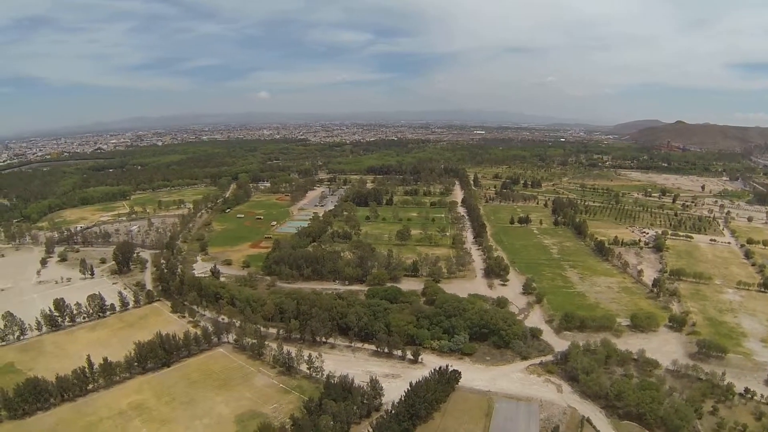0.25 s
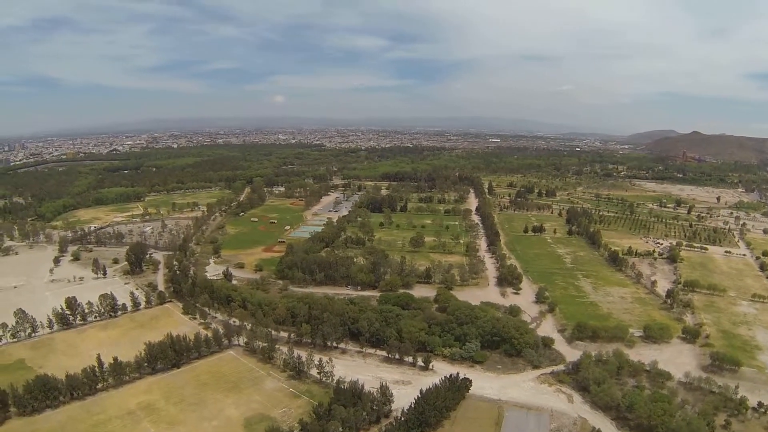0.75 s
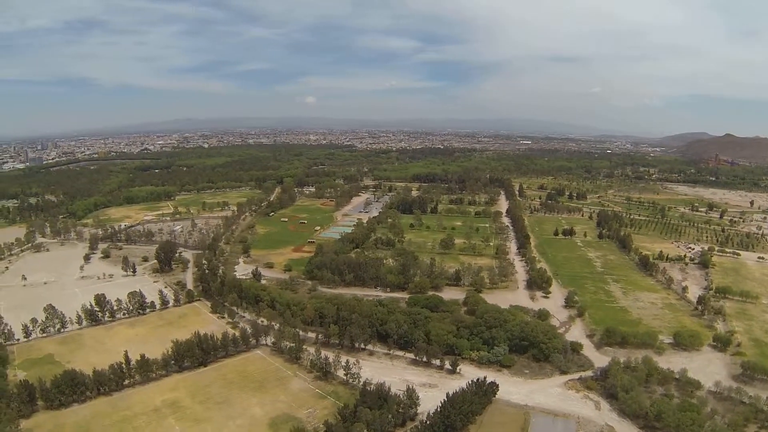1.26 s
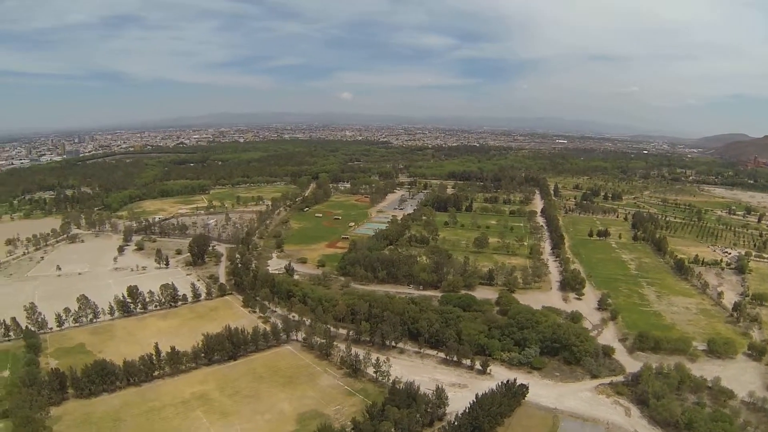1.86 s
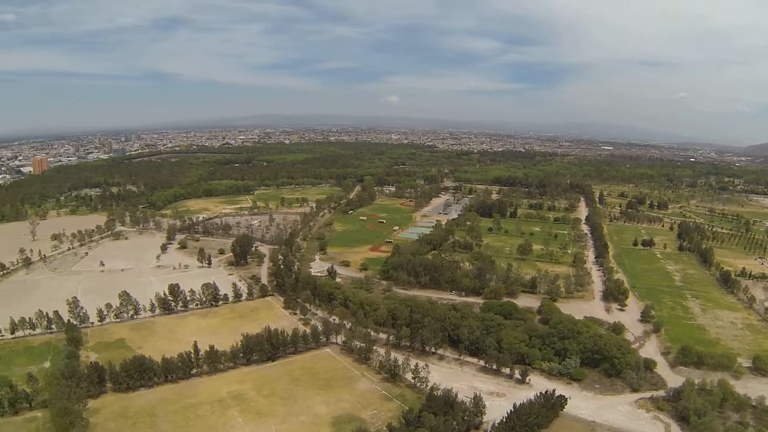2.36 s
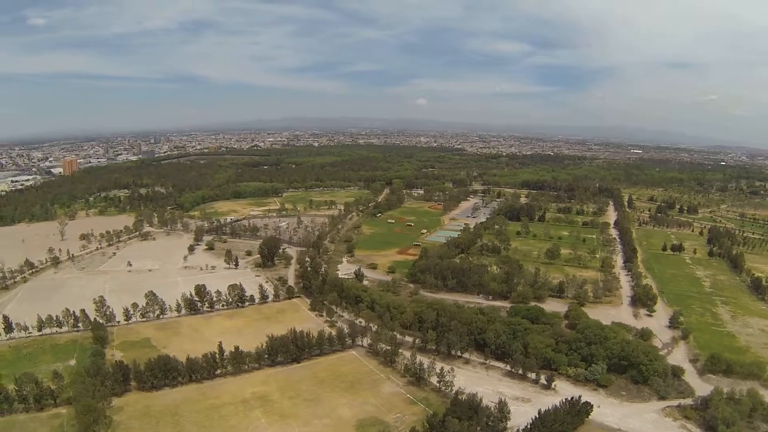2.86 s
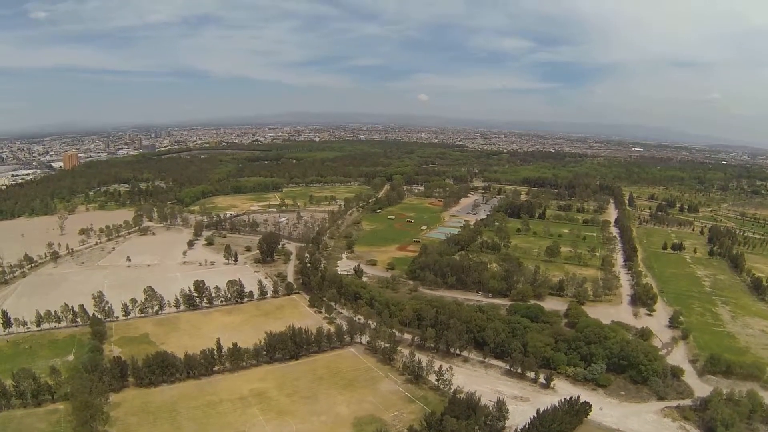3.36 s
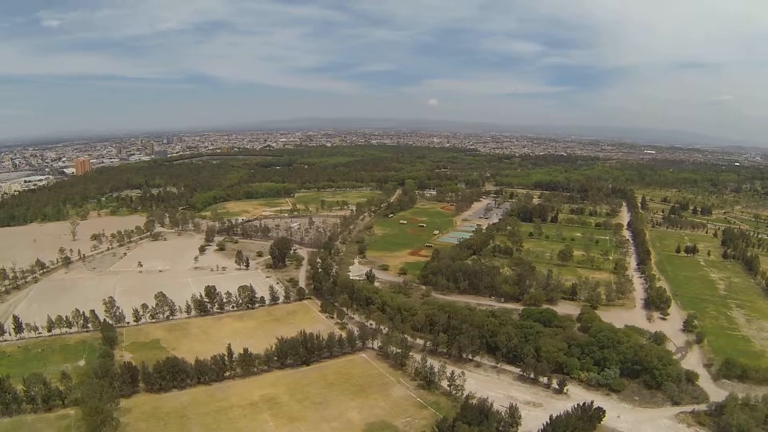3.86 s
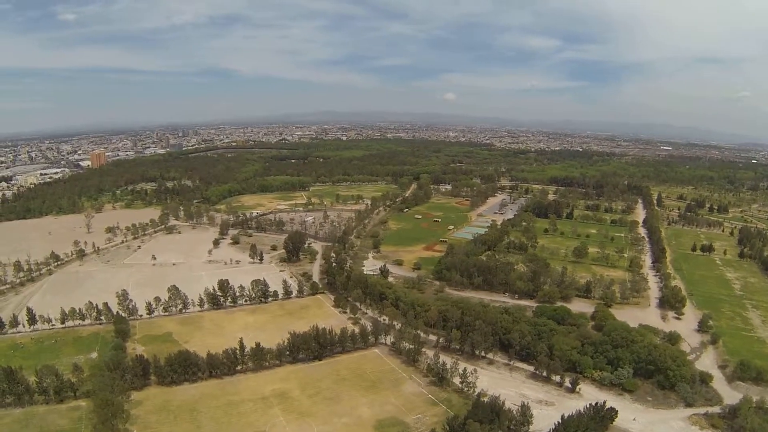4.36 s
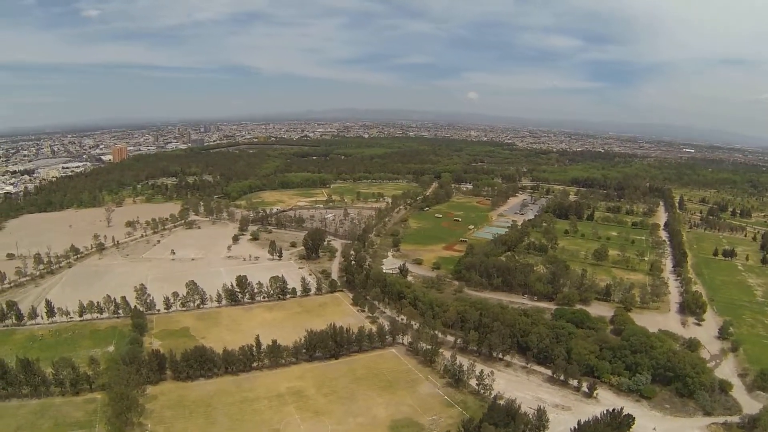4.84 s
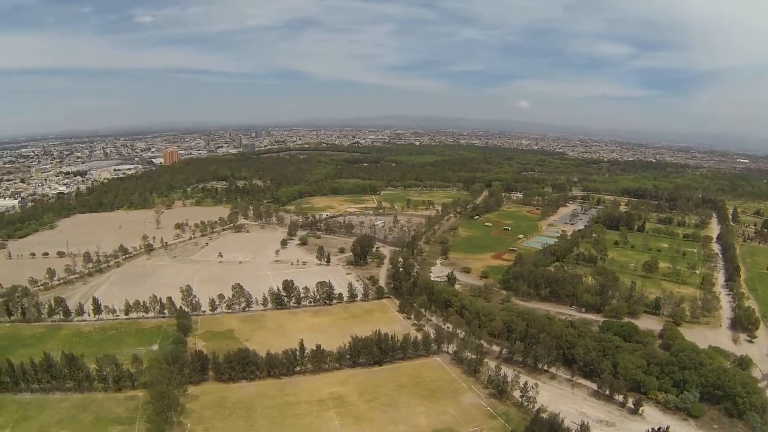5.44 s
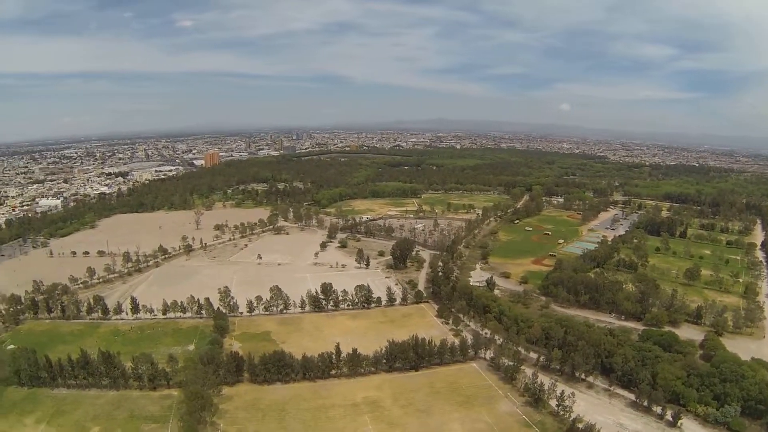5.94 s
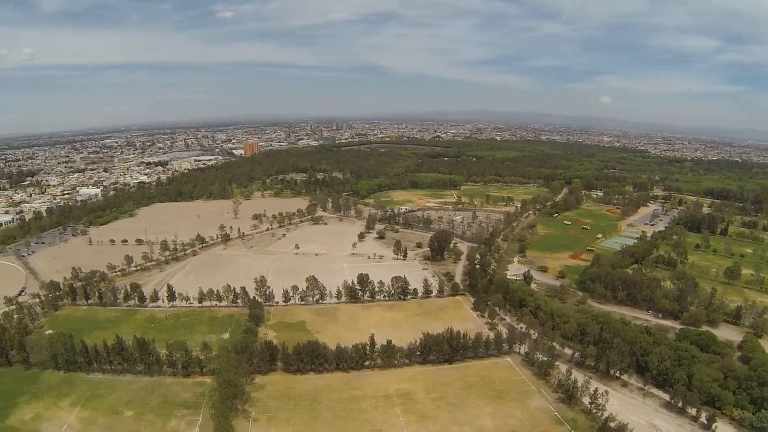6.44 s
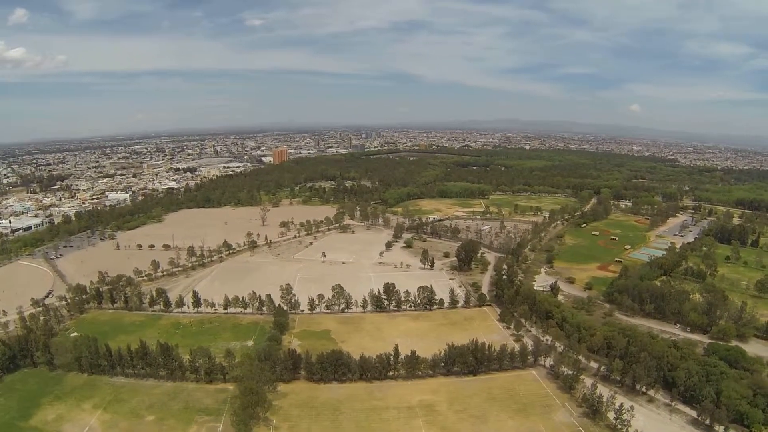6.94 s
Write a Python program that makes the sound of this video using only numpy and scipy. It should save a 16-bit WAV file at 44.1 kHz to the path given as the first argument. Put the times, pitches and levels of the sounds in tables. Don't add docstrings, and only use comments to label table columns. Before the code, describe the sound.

Close, boxy buzz of a hovering drone wavers and beats, then its pitches spread in a banking turn as wind thumps and blades hiss.

```python
import sys
import numpy as np
from scipy import signal
from scipy.fft import rfft, irfft, next_fast_len
from scipy.io import wavfile
from scipy.ndimage import uniform_filter1d

SR = 44100
rng = np.random.default_rng(int(sys.argv[2]) if len(sys.argv) > 2 else 0)


def wrap_up_sound(samples):
    columns = np.atleast_2d(samples).T
    tamed = np.clip(columns, -1, 1)
    steps = np.round(tamed * 32767).astype(np.int16)
    wavfile.write(sys.argv[1], SR, steps)


def ratio(d):
    e = np.asarray(d, float) / 20
    return 10 ** e


N = 317520
T = np.arange(N) / SR

# time_s, blade_passes_hz
ROTOR_1_SPEED = [(0, 167.8), (.22, 169.3), (.75, 164.2), (1.2, 169.2), (1.65, 168.2), (2, 165.6),
                 (2.4, 166.3), (2.85, 169.3), (3.2, 168), (3.52, 161.4), (4.05, 157.1), (4.3, 157.8),
                 (4.6, 153.6), (4.82, 154.6), (5.28, 151.4), (5.65, 155.3), (6.3, 156.4), (6.88, 161.8)]
ROTOR_2_SPEED = [(0, 180.2), (.6, 177), (.8, 178), (1.05, 177.6), (1.4, 179.8), (1.95, 176.4), (2.4, 179),
                 (2.9, 183.3), (3.35, 179), (3.9, 176.5), (4.8, 174.2), (5.25, 173.5), (5.55, 174.3),
                 (6, 178.3), (6.55, 181.9), (7.2, 182.3)]
ROTOR_3_SPEED = [(0, 151.7), (.2, 150.9), (.45, 154.3), (.8, 157.4), (1.1, 155.1), (1.65, 153.5),
                 (2.15, 154.7), (2.55, 150.5), (2.97, 144.7), (3.45, 148.8), (3.75, 148.4), (4.05, 146.7),
                 (4.55, 147.6), (4.87, 149.6), (5.65, 147.6), (6, 145.8), (6.3, 147.8), (7.2, 147.4)]
ROTOR_4_SPEED = [(0, 155.4), (.45, 155.6), (.82, 157.3), (1.35, 155.5), (2, 159.5), (2.5, 158.9), (3, 157),
                 (3.5, 155.9), (3.78, 157.8), (4.1, 157.1), (4.35, 159.7), (4.75, 166.6), (5.25, 167.1),
                 (5.7, 165.3), (6, 165.1), (6.3, 162.9), (7.2, 160.6)]
# time_s, bank (0 hover to 1 full turn)
BANK = [
    (0, 0),
    (3.5, 0.3),
    (4.0, 1),
    (7.2, 0.91),
]
USUAL_RATE = [163, 178, 150, 159]
BLADE_TONE = [-27, -27, -34.5, -37]
BLADE_TONE_SLOPE = [0.43, -0.15, 1.4, 0.0051]
BLADE_TONE_TURN = [-6.5, -3.5, 0, 4]
DOUBLE_TONE = [-22, -35, -33.5, -29.5]
DOUBLE_TONE_TURN = [-2.5, -4.5, 4, 3.5]
# time_s, rotor_1_db, rotor_3_db, rotor_4_db
MOUNT_SLACK = [(0, -5.5, -8, -0.5), (.6, -0.5, -1, 0), (1.2, 1, -2, -5.5), (1.8, -1.5, 7, -1),
               (2.4, 2.5, -10, -7.5), (3, -0.5, 3.5, 4.5), (3.6, -1.5, 2, 3), (4.2, 1, -3.5, -1),
               (4.8, 0.5, 5, 0), (5.4, 3, 1, 0), (6, 4.5, 4.5, 2.5), (6.6, -2.5, -5, 3.5),
               (7.2, -2.5, -3, 0)]
SUM_TONE = [-36, -28, -32.5, -31.5, -29.5, -41.5]
SUM_TONE_TURN = [0.5, 3, 0.5, -1, -1, 3]
SHAFT_WOBBLE = [-36.5, -42, -40.5, -39]
THIRD_WOBBLE = [-51.5, -47.5, -53.5, -39.5]
# pitch_hz, level_db_per_hz
CASE_BOOM = [(150, -51.5), (250, -11), (325, -7.5), (450, -9.5), (720, -11), (800, -18), (1000, -37),
             (1500, -91)]
# pitch_hz, width_hz, level_db
PANEL_PEAKS = [
    (246, 8.3, 4.5),
    (323, 22, 1.5),
    (546, 60, -5.5),
    (613, 10, 2),
    (393, 40, -3),
]
# time_s, rotor_1_db, rotor_2_db, rotor_3_db (over the hiss)
WAKE_SLAPS = [(0, -5, 5, 5.5), (.6, -5, 8, 9), (1.5, -8, 5, 9), (1.95, -8.5, 6, 7.5), (2.4, -7.5, 4, 2.5),
              (3.3, -6.5, 7, -3.5), (3.75, -6, 5, -3), (3.9, 16.5, 5, -3.5), (4.8, 15, -3, -3.5),
              (5.4, 13.5, 3.5, 1.5), (6, 16, -0.5, 0), (7.2, 17, -0.5, -2.5)]
SLAP_FADE = [11.6, 14, 21.]
# pitch_hz, level_db_per_hz
WALL_HISS = [(500, -46), (850, -4), (1010, -9), (2450, -20), (4800, -30), (5400, -43.5), (7000, -47),
             (10000, -91)]
# pitch_hz, width_hz, level_db
WALL_HISS_PEAKS = [
    (2840, 440, -3.5),
    (3430, 150, 4),
]
# pitch_hz, level_db_per_hz
TIP_FIZZ = [(2500, -82.5), (4300, -23), (5200, -3), (8000, -7), (10000, -17), (12500, -28.5),
            (15000, -47.5), (20000, -90)]
# time_s, gain_db
GAIN_CEILING = [(0, 2.5), (.95, 2.5), (1.8, 2), (3, 0), (4, -1.5), (5.9, 2), (6.3, -5.5), (7.2, -2)]
# time_s, depth_db
JOLT_DUCKS = [(.28, 2.5), (1.1, 4.5), (1.3, 5), (1.569, 6.5), (1.97, 7), (2.18, 4), (2.6, 0.5), (3, -1),
              (3.47, -0.5), (3.971, 7), (4.25, 7.5), (4.45, 6), (4.741, 2.5), (4.97, 6.5), (5.21, 5),
              (5.441, 8), (5.679, 4), (6.091, 6), (6.42, 5), (6.78, 6.5), (7.1, 1.5)]
# time_s, level_db
STEADY_WIND = [
    (0, -21),
    (.5, -22.5),
    (1.5, -25),
    (3.1, -18),
    (3.8, -23.5),
    (5.7, -27.5),
    (7.2, -22.5),
]
# time_s, change_db
WIND_GUSTS = [(0, 9), (0.271, 7), (.46, -4), (1.02, 1.5), (1.7, 3), (2.17, 4.5), (2.56, 3.5), (2.95, 3),
              (3.95, 5), (4.08, -6), (4.28, -4), (4.689, 2.5), (4.909, 9), (5.41, 9), (6.1, -1), (6.22, 6),
              (6.5, 2.5), (6.7, -3), (7.09, 4)]
# pitch_hz, level_db_per_hz
WIND_TONE = [(11, -32), (18, -3), (70, 0.5), (124, -3), (150, -6), (270, -12.5), (340, -40), (600, -120)]
# pitch_hz, level_db
CONTROLLER_TONES = [
    (8040, 0),
    (8066.5, -3),
    (8070.3, -8),
]
# start_s, length_s, level_db
BUZZ_SPELLS = [(0, .44, -52), (0.47, .06, -50), (0.57, 0.18, -51), (0.93, 0.064, -53.5),
               (1.022, 0.091, -51.5), (1.374, 0.06, -57), (1.762, 0.071, -49), (1.844, 0.11, -52.5),
               (2.108, 0.074, -54.5), (2.279, .15, -57), (2.566, 0.089, -56), (3.077, 0.045, -51),
               (3.17, 0.061, -55), (3.288, 0.2, -52.5), (4.179, .07, -52.5), (4.506, 0.19, -59.5),
               (6.555, 0.33, -63)]
# pitch_hz, width_hz, level_db
LOOSE_PART_RINGS = [
    (3370, 210, -8),
    (3450, 230, -7),
    (3820, 490, 4),
    (4470, 260, -7.5),
]


def evened(x):
    return x / np.sqrt(np.mean(x ** 2) + 1e-20)


def played(rows):
    s, *columns = np.transpose(rows)
    return np.array([np.interp(T, s, column) for column in columns])


def read(points, hz):
    f, db = np.transpose(points)
    return np.interp(np.log(hz + 1), np.log(f + 1), db)


def coloured(x, points, peaks=()):
    margin = 2048
    x = np.pad(x, margin, "reflect")
    size = next_fast_len(len(x))
    hz = np.fft.rfftfreq(size, 1 / SR)
    db = read(points, hz)
    for f, width, top in peaks:
        db = db + top * np.exp(-((hz - f) / width) ** 2)
    shaped = irfft(rfft(x, size) * ratio(db), size)
    return evened(shaped[margin:][:N])


def drift(hz, count=1):
    steps = rng.standard_normal((count, 4096))
    b, a = signal.butter(2, np.clip(hz / 250, .001, .9))
    smooth = signal.lfilter(b, a, steps)[:, 400:]
    return np.array([np.interp(T * 500, np.arange(len(s)), evened(s)) for s in smooth])


def by_turn(hover_db, turn_db):
    return np.c_[hover_db] + np.c_[turn_db] * played(BANK)


def ducking():
    duck_s, recover_s = 0.034, 0.16
    lost_db = 0
    for s, db in JOLT_DUCKS:
        drop = np.clip((T - s) / duck_s + .5, 0, 1)
        recovery = np.exp(-np.maximum(T - s, 0) / recover_s)
        lost_db = lost_db + db * drop * recovery
    return -lost_db


def blade_angles():
    speeds = np.vstack([played(rows) for rows in (ROTOR_1_SPEED, ROTOR_2_SPEED, ROTOR_3_SPEED, ROTOR_4_SPEED)])
    steady = uniform_filter1d(speeds, size=4000, mode="nearest")
    hz = steady * (1 + .0012 * drift(6, count=4))
    passes = np.cumsum(hz, axis=1) / SR + rng.random((4, 1))
    return steady, 2 * np.pi * passes


def frame_shake(hz, angle):
    wobble = ratio(np.c_[SHAFT_WOBBLE] + 3.5 * drift(5.5, count=4)) * np.cos(angle / 2)
    wobble += ratio(np.c_[THIRD_WOBBLE] + 4.0 * drift(4, count=4)) * np.cos(3 * angle / 2)
    speed_db = np.c_[BLADE_TONE_SLOPE] * (hz - np.c_[USUAL_RATE])
    thump_db = by_turn(BLADE_TONE, BLADE_TONE_TURN) + speed_db
    thump = ratio(thump_db + 1.1 + 2.7 * drift(4.5, count=4)) * np.cos(angle)
    return np.sqrt(2) * (wobble + thump).sum(0)


def mount_ring(angle):
    slack_db = np.insert(played(MOUNT_SLACK), 1, 0, axis=0)
    double_db = by_turn(DOUBLE_TONE, DOUBLE_TONE_TURN) + slack_db
    double_level = ratio(double_db + 3.0 + 2.1 * drift(11, count=4))
    uneven = .55 * drift(9, count=4)
    double = double_level * np.cos(2 * angle + uneven)
    first, second = np.triu_indices(len(angle), k=1)
    sum_level = ratio(by_turn(SUM_TONE, SUM_TONE_TURN) + 2.43 * drift(5.24, count=6))
    sums = sum_level * np.cos(angle[first] + angle[second])
    beat = 1 + 0.12 * np.cos(angle[1] - angle[0])
    return np.sqrt(2) * (double.sum(0) * beat + sums.sum(0))


def case_boom(ring):
    swing = evened(ring)
    knock = coloured(swing ** 2, CASE_BOOM, PANEL_PEAKS)
    puff_level = 1.14 + 0.37 * np.clip(swing, 0, 2.2) ** 2
    puffs = coloured(puff_level * rng.standard_normal(N), CASE_BOOM, PANEL_PEAKS)
    return ratio(-22.5 + 0.36 * drift(3.7)[0]) * (0.31 * knock + puffs)


def gusts():
    gust_s = 0.035
    return sum(db * np.exp(-((T - s) / gust_s) ** 2) for s, db in WIND_GUSTS)


def blade_slaps(angle, strength):
    orders = np.arange(5, 21)[:, None]
    rise = 1 - np.exp(-(orders / 5.5) ** 4)
    slaps = 0
    for m, reach in enumerate(SLAP_FADE):
        fade = np.exp(-(orders / reach) ** 2)
        slaps = slaps + (strength[m] * rise * np.cos(orders * angle[m]) * fade).sum(0)
    return slaps


def blade_rush(angle, ring, gain_db, duck_db):
    strength = ratio(played(WAKE_SLAPS) + 1.3 * drift(10, count=3))
    slaps = blade_slaps(angle, strength)
    passes = (strength * np.exp(2.0 * (np.cos(angle[:3]) - 1))).sum(0)
    hiss_level = 0.65 + 0.21 * passes + 0.58 * np.clip(evened(ring), 0, 2.2)
    hiss = evened(hiss_level * rng.standard_normal(N))
    ruffle_db = 1.0 * drift(22)[0]
    fizz_db = -61 - 0.68 * T + gain_db + duck_db
    fizz_db = fizz_db + 5.5 * np.exp(-T / 0.015)
    rush_db = -37.5 + 1 * played(BANK)[0] + 0.48 * gain_db + 0.75 * duck_db
    rush_db = rush_db + 0.36 * np.maximum(gusts(), 0)
    fizz = ratio(fizz_db + ruffle_db) * coloured(hiss + .8 * rng.standard_normal(N), TIP_FIZZ)
    rush = ratio(rush_db + ruffle_db) * coloured(hiss + 0.042 * slaps, WALL_HISS, WALL_HISS_PEAKS)
    return rush + fizz


def wind():
    level_db = played(STEADY_WIND)[0] + gusts() + 1.2 * drift(36)[0]
    return ratio(level_db) * coloured(rng.standard_normal(N), WIND_TONE)


def motors(hz, angle, gain_db):
    knee_hz = 162.6
    whine_db = -71.5 + 4 * np.minimum(hz[0] - knee_hz, 0)
    whine = ratio(whine_db + 3.0 * drift(30)[0]) * np.cos(42 * angle[0])
    whistles = sum(ratio(db) * np.cos(2 * np.pi * (f * T + rng.random())) for f, db in CONTROLLER_TONES)
    return np.sqrt(2) * (whine + ratio(-64 + gain_db) * whistles)


def buzz():
    tick_hz, edge_s = 123.1, 0.0067
    spells = 0
    for s, length, db in BUZZ_SPELLS:
        to_edge = np.minimum(T - s, s + length - T)
        spells = spells + ratio(db) * np.clip(to_edge / edge_s, 0, 1)
    is_tick = np.diff(np.floor(T * tick_hz), prepend=0) > 0
    ticks = is_tick * ratio(2.2 * rng.standard_normal(N))
    puff = signal.oaconvolve(ticks, np.exp(-T[:300] / 0.0019))[:N] * rng.standard_normal(N)
    t = T[:900]
    ring = 0
    for f, width, db in LOOSE_PART_RINGS:
        ring = ring + ratio(db) * np.exp(-np.pi * width * t) * np.sin(2 * np.pi * f * t)
    ring = ring * np.minimum(t / 0.00044, 1)
    rung = signal.oaconvolve(ticks + 0.04 * puff, ring)[:N]
    low_cut = signal.butter(8, 3270, "high", fs=SR, output="sos")
    return spells * evened(signal.sosfilt(low_cut, rung))


def scene():
    gain_db, duck_db = played(GAIN_CEILING)[0], ducking()
    hz, angle = blade_angles()
    shake = frame_shake(hz, angle)
    ring = mount_ring(angle)
    mix = shake + ring + case_boom(ring)
    mix = mix + blade_rush(angle, ring, gain_db, duck_db)
    mix = mix + wind() + motors(hz, angle, gain_db + duck_db) + buzz()
    return mix[None]


def low_pass(x):
    return signal.sosfilt(signal.butter(12, 14660, fs=SR, output="sos"), x)


def record(dry):
    power_db = 10 * np.log10(abs(uniform_filter1d(dry ** 2, 600)) + 1e-9)
    over_db = np.maximum(power_db + 11.0, 0)
    shaved = dry / ratio(0.78 * uniform_filter1d(over_db, 300))
    shaved *= 1 - .8 * np.exp(-T / .006) - .9 * np.exp(-T[::-1] / .002)
    finished = np.tanh(shaved / 1.818) * 1.768
    return low_pass(finished)


dry = scene()
out = record(dry)
wrap_up_sound(out)
```